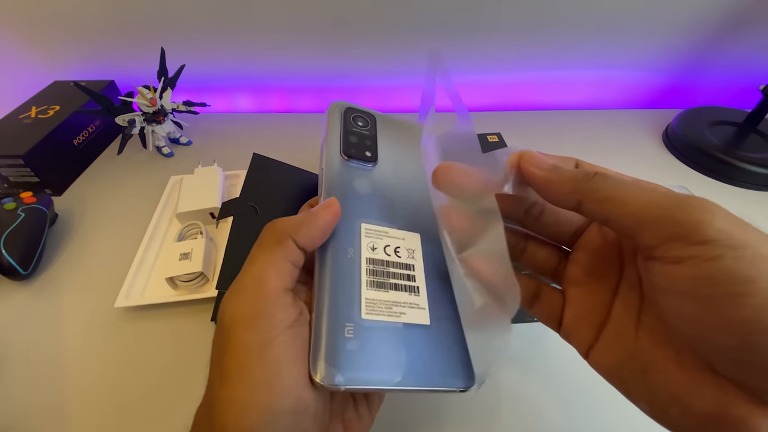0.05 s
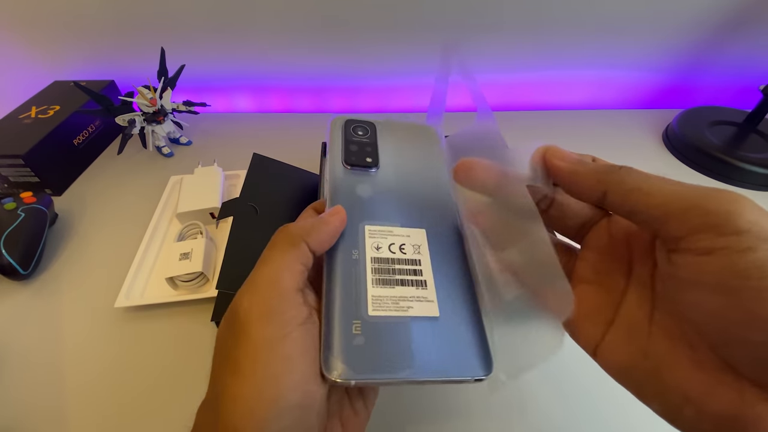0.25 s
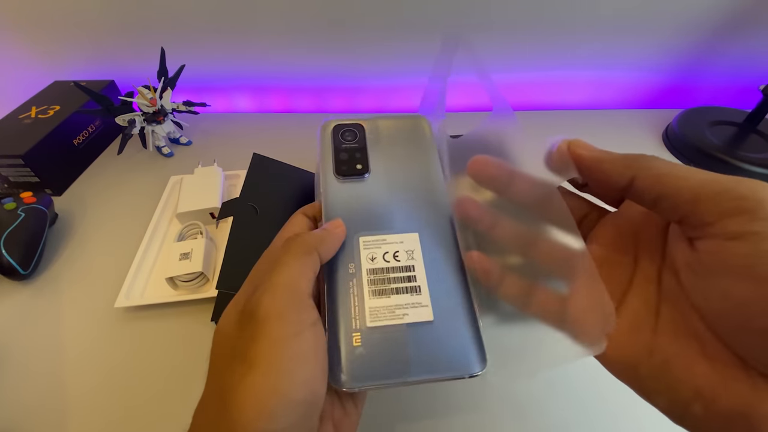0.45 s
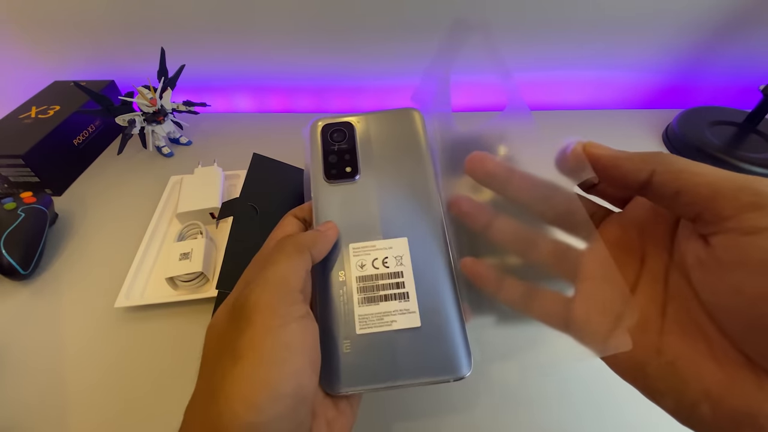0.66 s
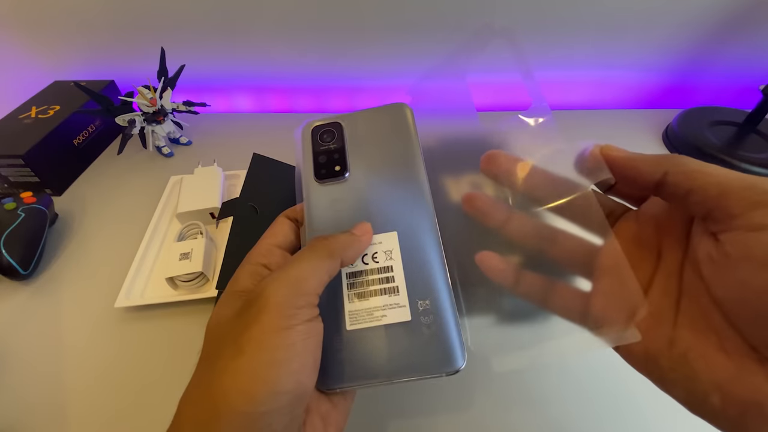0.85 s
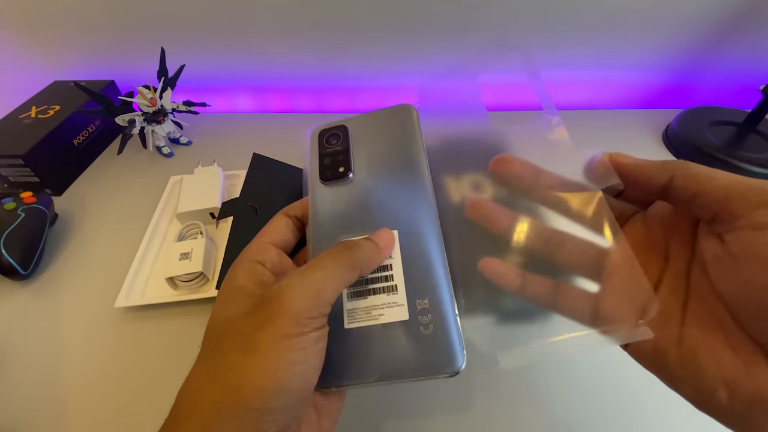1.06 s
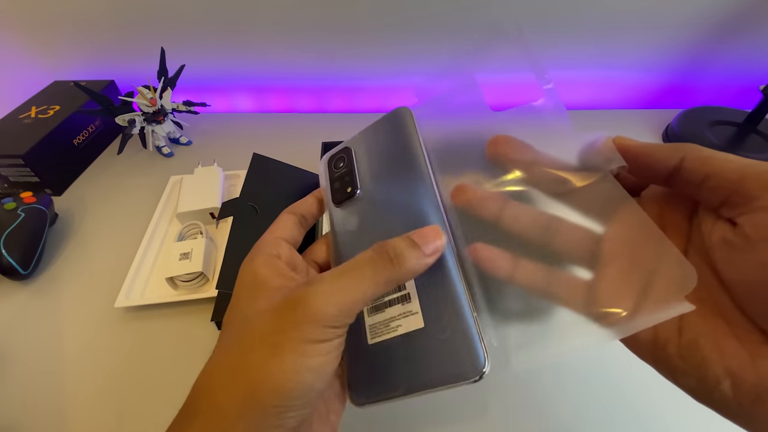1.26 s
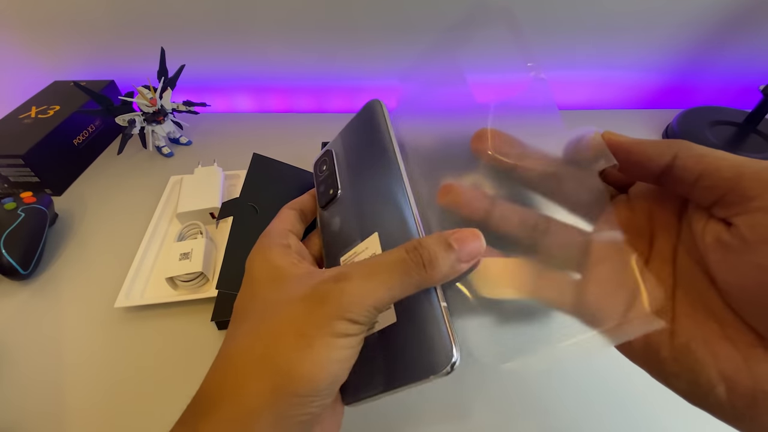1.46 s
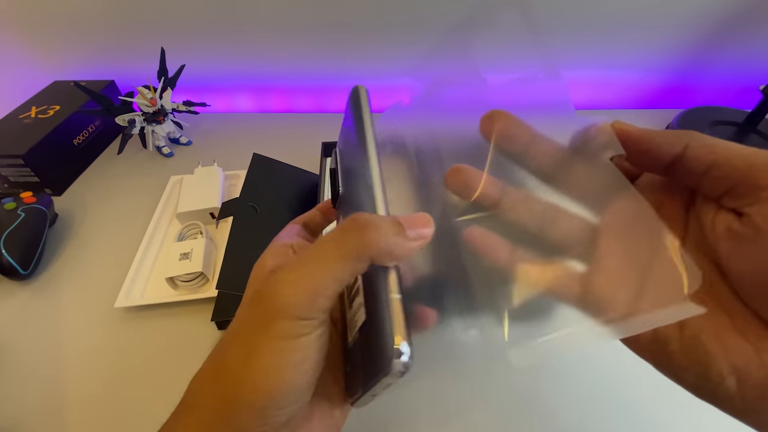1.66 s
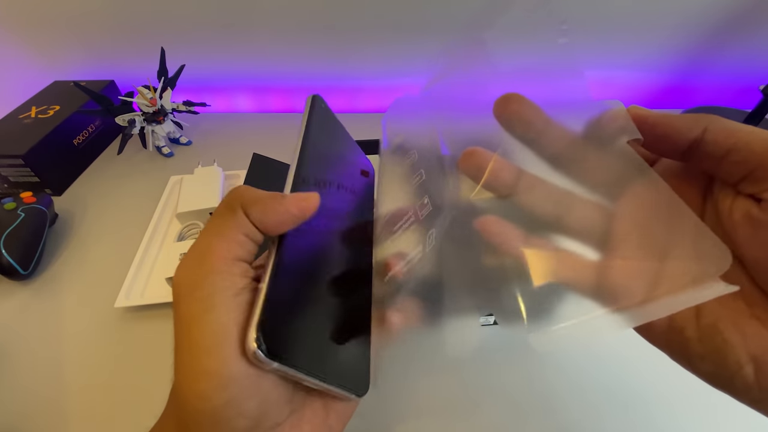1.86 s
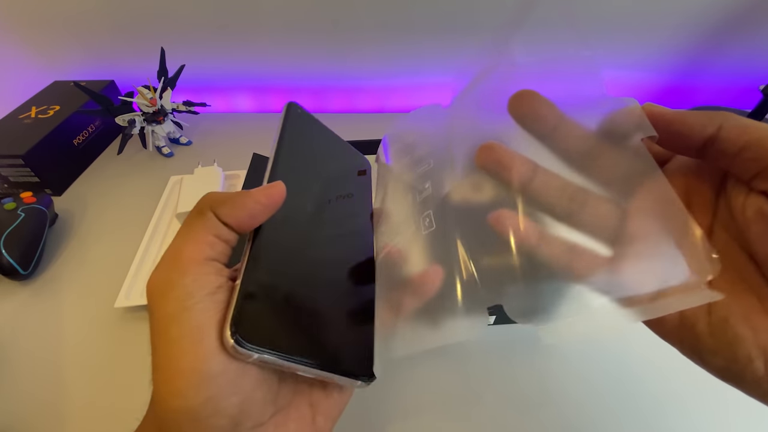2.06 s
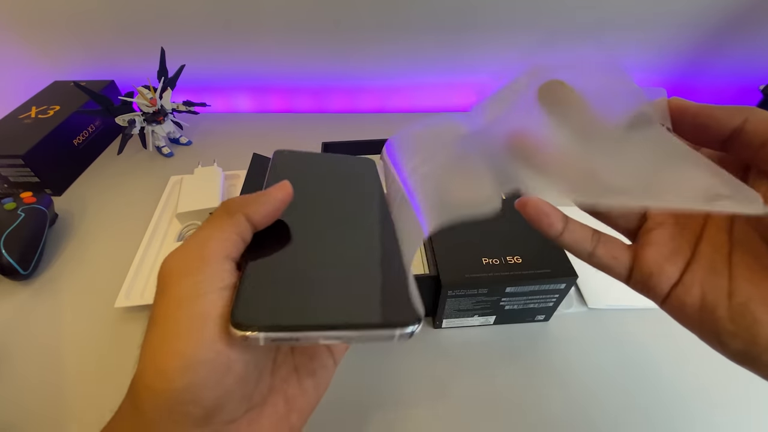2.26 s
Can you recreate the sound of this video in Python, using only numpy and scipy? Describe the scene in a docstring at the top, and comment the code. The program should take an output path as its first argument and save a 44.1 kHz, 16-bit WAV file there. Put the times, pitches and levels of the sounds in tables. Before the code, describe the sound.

Thin plastic film crinkles close by, slightly left, in a small room. Soft sliding grows into bright snaps from 0.2 s, strongest near 0.28, with fluttering pops and crackles until 0.62. A lone snap at 0.83, then sparse faint ticks until 1.5. Crackling returns at 1.53-1.76, and a gritty rustle at 1.92-2.04; light rustling ends it. Low air puffs, steady hush and faint hum lie beneath.

```python
"""A thin clear plastic film is pulled off a handheld device above a desk in a small room.
Buckling creases make sharp snaps: short noise bursts in four bands, each with a diffuse shiver.
Flips of the sheet are dispersive bending waves, heard as short falling chirps. Between them the film
slides with hiss, crackles and ticks; air it pushes is low noise; a steady hush and faint hum lie below.
A close stereo microphone hears it all."""
import sys
import numpy as np
from scipy import signal
from scipy.fft import rfft, irfft, next_fast_len
from scipy.io import wavfile

SR = 44100
rng = np.random.default_rng(int(sys.argv[2]) if len(sys.argv) > 2 else 0)


def log_audio(samples):
    """Write samples as a 16-bit WAV file to the path given in sys.argv[1]."""
    # one column per channel
    frames = np.atleast_2d(samples).T
    # limit to full scale, then quantise
    limited = np.clip(frames, -1, 1)
    pcm = np.round(limited * 32767).astype(np.int16)
    wavfile.write(sys.argv[1], SR, pcm)


N = 101429
TIME = np.arange(N) / SR

SNAP_TRIM_DB, SNAP_PAN_DB = -1, 4
SNAP_SPAN_S = .005   # each band's level is its RMS over this span
SHIVER_S, SHIVER_LIKENESS = 0.0078, 0.35   # decay; power share common to both sides
# Buckling creases: start_s, core level_db [before the trim], body_db, bite_db, sparkle_db [re core],
# ring_ms [decay before the spectrum is evened], shiver_db [re crack], left_lead_ms
CREASE_SNAPS = [(0.0352, -48.5, -21, -9, -33, 1.1, -2, 0.24),
                (0.1035, -38.5, -14.5, -9, -7.5, 7.5, 3, -0.2),
                (0.2168, -29.5, -11.5, -3.5, 5.5, 3, 0, -0.19),
                (0.2423, -33.5, -13, -11, -16.0, 2.4, -6, -0.35),
                (0.2647, -32, -13, -19, -15, 2.9, -1, -0.48), (0.2771, -24, -18.5, 7, 3, 1.7, -7, 0.057),
                (0.2787, -23.5, -18, -1, -3, 1.5, -2.5, 0.24), (0.351, -32, -10.5, -4, -20, 1.6, -3, 0.2),
                (0.411, -43.5, -8.0, -3, 0, 1.2, 1, -0.3), (0.4205, -47.0, -5, -4, -6, 2, -6.0, -0.25),
                (0.4503, -40, 0, 2, -5.5, 1.2, 0.5, 0.28), (0.4792, -48.5, 0.5, 2.0, 2.5, 1.7, 4, -0.058),
                (0.4865, -38, -14, -9.0, -7.5, 3.6, 1, -0.16),
                (0.5241, -26.5, -16, -10.5, -6.5, 1.2, -3, 0.37),
                (0.5475, -41.5, -22, 1, 0, 9.8, -3.0, -0.45), (0.5538, -33.5, -3.5, -0.5, -0.5, 5, 6, 0.19),
                (0.5564, -38, -1.5, 9.5, -10, 8.5, -2.5, 0.1),
                (0.5645, -32.0, -2, -1.5, -5.5, 1.8, 2.5, 0.3),
                (0.6013, -36.5, -19, -3.5, -10, 2, 3, -0.13), (0.6189, -45.5, 4, -4, 2, 2.8, 0, -0.036),
                (0.8098, -56.5, 3, -2, -1, 10, 1, 0.16), (0.831, -38.5, -4, -2.5, -7, 0.92, 4, 0.21),
                (0.9513, -43.5, -30, -3, -12.5, 0.75, -6, 0.27),
                (1.0661, -49.5, 0, -3.5, 5, 0.97, -3.5, -0.21),
                (1.1393, -57.5, 4.5, 3.0, 10.5, 4.0, 16, -0.16),
                (1.2627, -46.5, -4, -13.5, -13, 1.3, -1.5, 0.22),
                (1.354, -65, 6, -11, -10, 2.7, -3.0, 0.16), (1.385, -57, 4, 0.5, 0, 3.0, 13, 0.26),
                (1.435, -56, 4.5, 3, 1, 3.3, -3.0, 0.34), (1.5274, -42, -2, -7, -28, 2.5, -4, 0.22),
                (1.5329, -33, -5, -28, -40, 4.2, -9, 0.16), (1.5472, -49, 0, -23, -34, 1.5, -9, -0.0091),
                (1.5927, -34, -2.5, -6.5, -16.5, 2.7, -1.5, 0.13),
                (1.6118, -30.5, -7.5, -3.5, -6.5, 3.3, 3.5, 0.12),
                (1.6357, -26.5, -8.5, 2.5, 1, 0.8, 0.5, 0.26), (1.6745, -55.5, 5, -16, 10, 3.1, -2, -0.16),
                (1.6973, -43, 2, -9.0, -20, 4.0, -3.0, 0.5), (1.7399, -42.5, 3, -14, -18.0, 4.5, 4, 0.22),
                (1.7546, -40.5, -10, -5, -22, 2.4, 11, 0.39),
                (1.7604, -40.5, -1, 6.5, -5.5, 1.7, -7, -0.16), (1.856, -61.5, -16, -5, 3, 0.77, -17, -0.2),
                (1.9177, -46, -12, 0, 5.0, 4.4, 9, -0.16), (1.926, -36, -21, 2.5, 4, 0.48, -6, 0.24),
                (1.9338, -39, -17, -1, -16, 2.4, 6, -0.28), (1.9458, -31.5, -22, -6, 0.5, 2.8, -1, -0.27),
                (1.9515, -49, -13, 1.0, -14, 3.5, -10, -0.13),
                (1.9691, -31.5, -3.5, -14, -32, 2.4, 6, 0.16), (1.98, -31, -9, -3, -6, 2.9, -4, 0.24),
                (1.9839, -33.5, -8, -3, 0, 2.7, 3.5, 0.11), (2.0128, -41.5, -13, -1, -1, 3.4, -11, -0.0041),
                (2.0176, -37.5, -10.5, -2, -7, 3, 1, -0.28), (2.04, -38.5, -14, -6, -7.5, 3, 0, -0.28),
                (2.136, -51.5, 4.5, -8.5, -13, 2, 7, 0.24), (2.2016, -47, -13, -8.5, -5, 3.1, 3, -0.42)]
# Bands of a snap, in the order core, body, bite, sparkle: low_hz, high_hz
SNAP_BANDS = [(1510, 3080), (306, 1235), (3400, 6580), (8100, 13760)]


def snaps():
    """Buckling: each crease releases a crack of a few ms, then a more diffuse shiver of the whole sheet."""
    out = np.zeros((2, N))
    for start_s, level_db, body_db, bite_db, sparkle_db, ring_ms, shiver_db, lead_ms in CREASE_SNAPS:
        sound = 0
        for (low_hz, high_hz), tint_db in zip(SNAP_BANDS, (0, body_db, bite_db, sparkle_db)):
            common = at_ports(crack(SHIVER_S), lead_ms)
            diffuse = dying_noise(SHIVER_S)
            shiver = np.sqrt(SHIVER_LIKENESS) * common + np.sqrt(1 - SHIVER_LIKENESS) * diffuse
            direct = at_ports(crack(ring_ms / 1000), lead_ms)
            part = band(direct + from_db(shiver_db) * shiver, low_hz, high_hz)
            early_rms = np.sqrt(np.mean(part[:, :int(SNAP_SPAN_S * SR)] ** 2))
            sound = sound + from_db(tint_db) * part / early_rms
        add(out, start_s, from_db(level_db + SNAP_TRIM_DB) * pan(SNAP_PAN_DB) * sound)
    return out


SNAP_ATTACK_MS = 0.32
CRACK_EVENNESS = .8   # 0 leaves the spectrum as drawn, 1 flattens it


def crack(ring_s):
    """Impulsive release: a fast-rising, decaying burst, its spectrum evened so that no pitch stands out."""
    t = TIME[:SR // 10]
    attack = 1 - np.exp(-t * 1000 / SNAP_ATTACK_MS)
    burst = rfft(rng.standard_normal(len(t)) * attack * np.exp(-t / ring_s))
    return irfft(burst / minimum_phase(np.abs(burst) ** CRACK_EVENNESS))


FLIP_PAN_DB = 7.5
FLIP_LOW_HZ = 55   # the sheet radiates little below this
# Small flips: rate, level relative to the air push, centre of the starting pitches, cycles, decay
FLUTTERS_PER_S, FLUTTER_DB, FLUTTER_HZ, FLUTTER_CYCLES, FLUTTER_S = 32, 2, 750, 3.5, 0.0055
# Big flips of the sheet: start_s, level_db [before panning], start_pitch_hz,
# cycles [per e-fold of falling pitch], decay_s
SHEET_FLIPS = [(0.28, -45, 1567, 6.7, 0.023), (0.31, -40, 360, 6.7, 0.021), (.352, -41, 690, 2.7, 0.0064),
               (.391, -44.5, 556, 2.85, .012), (0.426, -46, 453, 2.5, .012), (0.493, -33, 553, 3.3, 0.0055),
               (.553, -28, 1167, 9.2, 0.0044), (.564, -30, 936, 13.6, 0.01), (.577, -33.5, 470, 4.4, 0.015),
               (0.603, -36, 657, 4.41, 0.029), (.619, -35.5, 650, 2.5, 0.013),
               (0.81, -44.5, 785, 3.1, 0.014), (.831, -35, 996, 1.45, 0.022), (1.262, -43, 710, 1.7, 0.015),
               (1.527, -35.5, 1093, 5, 0.014), (1.533, -36.5, 810, 3.93, .008),
               (1.547, -34.5, 800, 2.4, .007), (1.581, -43, 706, 2.47, 0.038),
               (1.607, -30, 750, 7.9, 0.004), (1.636, -27.5, 904, 2.57, 0.0094),
               (1.733, -32, 803, 2.7, .008), (1.741, -28, 618, 14.6, 0.0067),
               (1.749, -29.5, 169, 1.9, 0.017), (1.968, -34, 800, 4.5, 0.0066),
               (1.983, -35.5, 500, 1.28, 0.023), (2.272, -45.5, 790, 7, 0.0084),
               (2.288, -42.5, 400, 1.7, .016)]


def flips():
    """Flexural waves: big flips at set times, and a random flutter of small ones that follows the air push."""
    out = np.zeros((2, N))
    for start_s, level_db, pitch_hz, cycles, decay_s in SHEET_FLIPS:
        add(out, start_s, from_db(level_db) * bending_wave(pitch_hz, cycles, decay_s))
    for when, size, pitch in rng.random((int(FLUTTERS_PER_S * N / SR), 3)):
        start_s = when * N / SR
        gain = 2 * size * from_db(np.interp(start_s, *np.transpose(PUSH_LEVEL)) + FLUTTER_DB)
        pitch_hz = FLUTTER_HZ * 2 ** (pitch - .5)   # within half an octave either way
        add(out, start_s, gain * bending_wave(pitch_hz, FLUTTER_CYCLES, FLUTTER_S))
    highpass = signal.butter(2, FLIP_LOW_HZ, "high", fs=SR, output="sos")
    return signal.sosfilt(highpass, out) * pan(FLIP_PAN_DB)


FLIP_SCATTER_DB, FLIP_SCATTER_S = -4, 0.003


def bending_wave(hz, cycles, decay_s):
    """Dispersion: highs arrive first, so pitch falls as hz / (1 + t hz / cycles); the edges scatter the wave."""
    t = TIME[:SR // 5]
    phase = 2 * np.pi * cycles * np.log(1 + t * hz / cycles)
    chirp = np.sin(phase) * np.exp(-t / decay_s) * (1 - np.exp(-t * hz))
    scattered = signal.fftconvolve(chirp[None], dying_noise(FLIP_SCATTER_S), axes=1)[:, :len(t)]
    return chirp + from_db(FLIP_SCATTER_DB) * scattered


SLIDE_PAN_DB = 3.5
CRACKLES_PER_S, CRACKLE_SPREAD_DB, CRACKLE_RING_S = 600, 5, 0.0013
HISS_DB = -3   # relative to the crackle of a firm rub
SMOOTH_BELOW_DB, GRITTY_ABOVE_DB, LIGHT_RUB_GRIT = -56.5, -46.5, .4   # grit rises from this to 1
# Film sliding over the case and fingers: time_s, level_db [before panning]
SLIDE_LEVEL = [(0, -58), (.08, -59.5), (.12, -54), (.2, -48.5), (.3, -46), (.42, -49.5), (.5, -48.5),
               (.545, -48.5), (.56, -48), (.62, -53), (.66, -54.5), (.78, -82), (1.03, -80), (1.09, -70),
               (1.145, -59), (1.19, -73), (1.25, -63), (1.33, -67), (1.45, -53), (1.51, -58), (1.6, -61.5),
               (1.67, -59), (1.74, -56), (1.8, -74), (1.89, -60), (1.95, -42), (2.02, -67), (2.085, -81),
               (2.11, -54), (2.16, -85), (2.22, -63), (2.3, -49)]
# Spectrum of the sliding: frequency_hz, relative density_db [per Hz]
SLIDE_SPECTRUM = [(30, -28), (200, -3.5), (600, 2.5), (1200, -4), (2200, 2.5), (5000, -3), (7500, -5),
                  (10500, -7), (14000, -6), (15500, -15.5), (16500, -20)]


def slide():
    """Stick-slip friction: hiss with tiny crackles, whose share grows the harder the film is pulled."""
    level_db = np.interp(TIME, *np.transpose(SLIDE_LEVEL))
    grit = np.interp(level_db, [SMOOTH_BELOW_DB, GRITTY_ABOVE_DB], [LIGHT_RUB_GRIT, 1])
    sizes = from_db(CRACKLE_SPREAD_DB * np.minimum(rng.exponential(1, N), 4))
    signs = rng.choice([-1, 1], N)
    clicks = sizes * signs * (rng.random(N) < CRACKLES_PER_S / SR)
    # eight spots on the film share the clicks, each with its own ring
    spot = np.arange(N) % 8
    crackle = np.zeros((2, N))
    for k in range(8):
        spot_clicks = (clicks * (spot == k))[None]
        crackle += signal.fftconvolve(spot_clicks, dying_noise(CRACKLE_RING_S), axes=1)[:, :N]
    hiss_gain = from_db(HISS_DB)
    rub = (grit * rms_one(crackle) + hiss_gain * stereo_noise(0)) / np.hypot(grit, hiss_gain)
    return rms_one(colour(rub, SLIDE_SPECTRUM)) * from_db(level_db) * pan(SLIDE_PAN_DB)


# Small creases, with level relative to the sliding
TICKS_PER_S, TICK_DB, TICK_SPREAD_DB, TICK_RING_S, TICK_LEAD_MS = 70, -1, 2.5, .0012, .25


def wrinkles():
    """Small-scale buckling: creases tick at random, their strength following the slide."""
    out = np.zeros((2, N))
    for when, size, side in rng.random((int(TICKS_PER_S * N / SR), 3)):
        start_s = when * N / SR
        spread_db = TICK_SPREAD_DB * min(-np.log(size), 2)
        level_db = np.interp(start_s, *np.transpose(SLIDE_LEVEL)) + TICK_DB + spread_db
        tick = at_ports(crack(TICK_RING_S), TICK_LEAD_MS * np.sign(side - .5))
        add(out, start_s, from_db(level_db) * np.sqrt(SNAP_SPAN_S * SR) * tick)
    return colour(out, SLIDE_SPECTRUM) * pan(SLIDE_PAN_DB)


PUSH_PAN_DB, PUSH_LIKENESS = -4, 0.7
# Air pushed by the sheet and hands: time_s, level_db [before panning]
PUSH_LEVEL = [(0, -60.5), (.22, -63), (.32, -45.5), (.42, -57.5), (.56, -61), (.63, -48), (.73, -64.5),
              (.81, -74), (.85, -51), (.93, -62.5), (1.26, -63), (1.44, -61.5), (1.64, -44), (1.71, -50),
              (1.77, -45), (1.85, -54.5), (1.96, -64), (2.0, -56), (2.07, -59), (2.25, -59.5), (2.3, -46)]
# Spectrum of the air push: frequency_hz, relative density_db [per Hz]
PUSH_SPECTRUM = [(20, -36), (40, -14.5), (65, 0.5), (115, -1), (250, -8.5), (600, -13.5), (1500, -31.5),
                 (5000, -72)]


def air_push():
    """Volume displacement: the flapping sheet and moving hands make a soft low rumble of shaped noise."""
    rumble = rms_one(colour(stereo_noise(PUSH_LIKENESS), PUSH_SPECTRUM))
    level_db = np.interp(TIME, *np.transpose(PUSH_LEVEL))
    return rumble * from_db(level_db) * pan(PUSH_PAN_DB)


DESK_ECHO_MS, DESK_ECHO_DB = 1.3985, -20


def desk_echo(x):
    """Specular reflection: the desk returns one weak, delayed copy."""
    return from_db(DESK_ECHO_DB) * np.array([delay(channel, DESK_ECHO_MS) for channel in x])


ROOM_BUILD_S = 0.004
# Reverberation of the small room: low_hz, high_hz, level_db [relative], t60_s
ROOM_BANDS = [(80, 235, -16, 0.24), (500, 1710, -6.5, 0.39), (2150, 7330, -8.5, 0.33),
              (7000, 13000, -12.5, 0.32)]


def room(x):
    """Diffuse reverberation: convolution with decaying noise in bands, shortest in the bass."""
    t, response = TIME[:SR // 2], 0
    for low_hz, high_hz, level_db, t60_s in ROOM_BANDS:
        envelope = (1 - np.exp(-t / ROOM_BUILD_S)) * from_db(-60 * t / t60_s)
        noise = band(rng.standard_normal((2, len(t))), low_hz, high_hz)
        response = response + from_db(level_db) * noise * envelope / np.sqrt(np.sum(envelope ** 2))
    return signal.fftconvolve(x, response, axes=1)[:, :N]


FLOOR_DB, FLOOR_LIKENESS = -59, 0.45
# Spectrum of the steady hush: frequency_hz, relative density_db [per Hz]
FLOOR_SPECTRUM = [(20, -13.5), (55, 2), (80, -5), (110, -3), (200, -0.5), (450, -7.5), (820, -15),
                  (1550, -24), (1800, -32.5), (10000, -34), (15500, -33.5)]


def hush():
    """Stationary noise: a steady, partly correlated stereo hush with a falling spectrum."""
    return from_db(FLOOR_DB) * rms_one(colour(stereo_noise(FLOOR_LIKENESS), FLOOR_SPECTRUM))


# Steady hum: pitch_hz, level_db [RMS]
HUM_TONES = [(54, -68.5), (108, -65.5)]


def hum():
    """Harmonic superposition: faint steady sines, each with a random phase."""
    out = np.zeros(N)
    for pitch_hz, level_db in HUM_TONES:
        out += from_db(level_db) * rms_one(np.sin(2 * np.pi * (pitch_hz * TIME + rng.random())))
    return out


def from_db(db):
    """Logarithmic level: decibels to an amplitude ratio."""
    return 10 ** (np.asarray(db) / 20)


def rms_one(x):
    """Power normalisation: scale to an RMS of one."""
    return x / np.sqrt(np.mean(x ** 2) + 1e-20)


def pan(db):
    """Constant-power panning: left and right gains, db apart."""
    return rms_one(from_db([[db / 2], [-db / 2]]))


def band(x, low_hz, high_hz):
    """Band-pass filtering: keep the range between two cutoffs."""
    return signal.sosfilt(signal.butter(3, [low_hz, high_hz], "band", fs=SR, output="sos"), x)


def minimum_phase(gain):
    """Minimum phase: the causal filter with these gains, found by folding the cepstrum."""
    cepstrum = irfft(np.log(gain + 1e-9))
    half = len(cepstrum) // 2
    cepstrum[1:half] *= 2
    cepstrum[half + 1:] = 0
    return np.exp(rfft(cepstrum))


def colour(x, points):
    """Spectral shaping: a causal filter through (Hz, dB) points, interpolated on log frequency."""
    size = 2 * next_fast_len(N)
    hz, db = np.transpose(points)
    bins_hz = np.arange(size // 2 + 1) * SR / size
    gain = from_db(np.interp(np.log(bins_hz + 1), np.log(hz), db))
    return irfft(rfft(x, size) * minimum_phase(gain))[..., :N]


def stereo_noise(likeness):
    """Partial coherence: likeness is the share of power common to both sides."""
    common = rng.standard_normal(N)
    separate = rng.standard_normal((2, N))
    return np.sqrt(likeness) * common + np.sqrt(1 - likeness) * separate


def dying_noise(decay_s):
    """Exponential decay: stereo noise that dies away, unit energy a side."""
    t = TIME[:SR // 10]
    x = rng.standard_normal((2, len(t))) * np.exp(-t / decay_s)
    return x / np.sqrt(np.sum(x ** 2, axis=1, keepdims=True))


def delay(x, ms):
    """Propagation delay: a shift by fractions of a sample, by linear interpolation."""
    t = TIME[:len(x)]
    return np.interp(t - ms / 1000, t, x, left=0)


def at_ports(x, lead_ms):
    """Arrival-time difference: the left port leads if lead_ms is positive; unit energy a side."""
    ports = np.array([delay(x, max(side * lead_ms, 0)) for side in (-1, 1)])
    return ports / np.sqrt(np.sum(ports ** 2, axis=1, keepdims=True))


def add(out, start_s, sound):
    """Superposition: mix a sound in at its start, cut at the end of the scene."""
    i = int(start_s * SR)
    out[:, i:i + sound.shape[1]] += sound[:, :N - i]


def scene():
    """Superposition: the film with its desk echo and room, over a steady hush and faint hum."""
    film = snaps() + wrinkles() + flips()
    film = film + desk_echo(film)
    return film + room(film) + slide() + air_push() + hush() + hum()


MONO_ABOVE_HZ, MONO_LAG_MS, CUTOFF_HZ = 10000, .204, 16300
# Port colour: frequency_hz, left_minus_right_db
PORT_BALANCE = [(100, 4.5), (600, 1), (1300, 0), (2300, -3), (3200, 1.5), (5500, 5), (7000, 2.5),
                (8800, -6.5), (11000, 3.5), (16000, -3.5)]
# Stereo width: frequency_hz, lift_db [side relative to mid]
STEREO_WIDTH = [(100, 1), (600, 2.5), (1400, 2.5), (3000, 0.5), (6000, -1), (16000, 5.5)]
# Presence of the top octave: frequency_hz, gain_db
TOP_PRESENCE = [(9000, -1.5), (11000, 3), (12800, -2), (14300, 4), (15500, 2), (16500, -3.5)]


def record(dry):
    """Mid-side stereo: width and port colour vary with pitch; the right port's top serves both, later on the left."""
    mid = colour(dry.mean(axis=0), [(hz, -db / 2) for hz, db in STEREO_WIDTH])
    side = colour((dry[0] - dry[1]) / 2, [(hz, db / 2) for hz, db in STEREO_WIDTH])
    left = colour(mid + side, [(hz, db / 2) for hz, db in PORT_BALANCE])
    right = colour(mid - side, [(hz, -db / 2) for hz, db in PORT_BALANCE])
    ports = np.array([left, right])
    low = signal.sosfilt(signal.butter(12, MONO_ABOVE_HZ, "low", fs=SR, output="sos"), ports)
    high = signal.sosfilt(signal.butter(12, MONO_ABOVE_HZ, "high", fs=SR, output="sos"), ports)
    top = colour(high[1], TOP_PRESENCE)
    late_top = np.pad(top, (round(MONO_LAG_MS * SR / 1000), 0))[:N]
    ports = low + np.array([late_top, top])
    return signal.sosfilt(signal.ellip(10, .3, 80, CUTOFF_HZ, fs=SR, output="sos"), ports)


dry = scene()
out = record(dry)
log_audio(out)
```